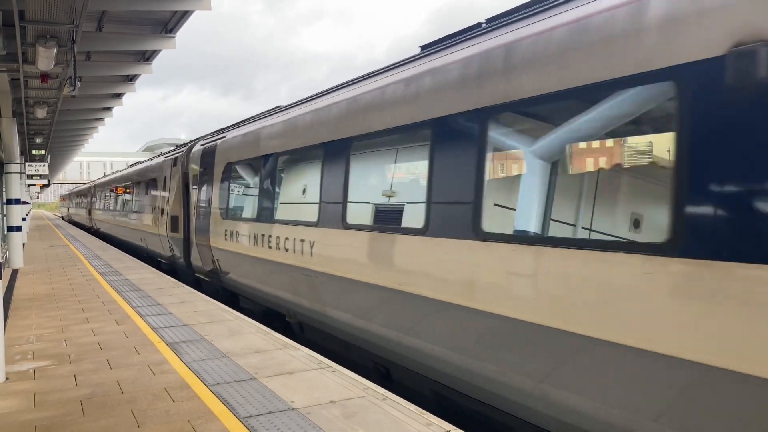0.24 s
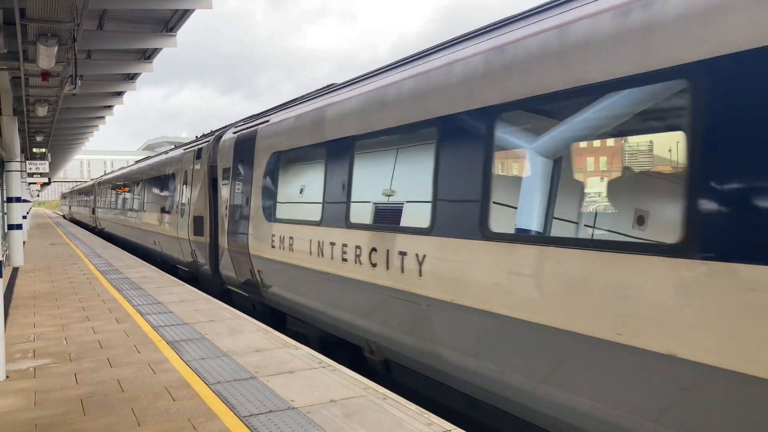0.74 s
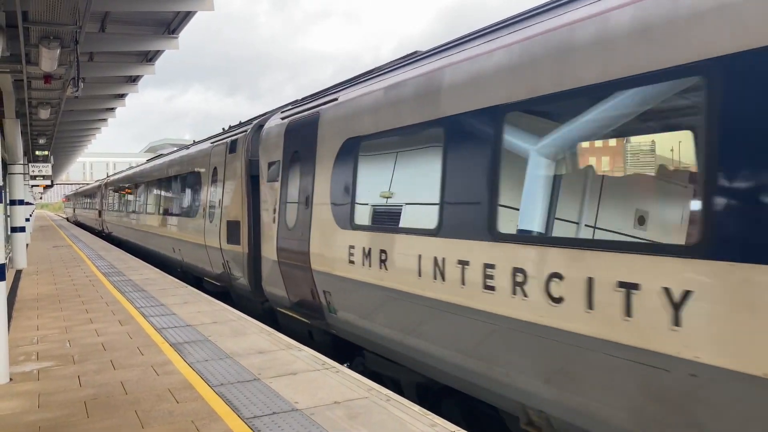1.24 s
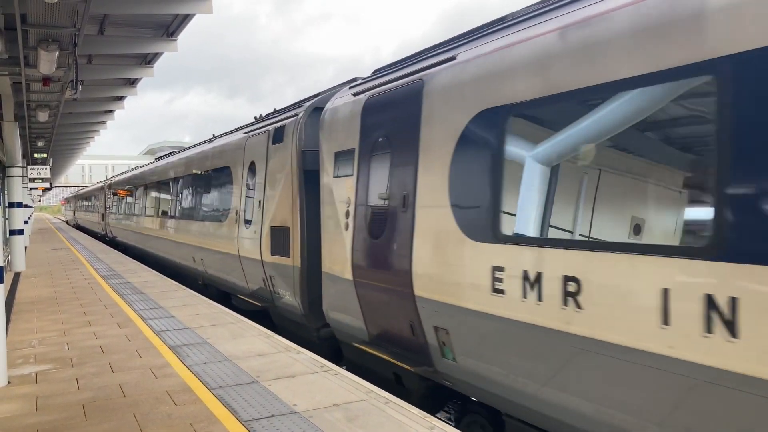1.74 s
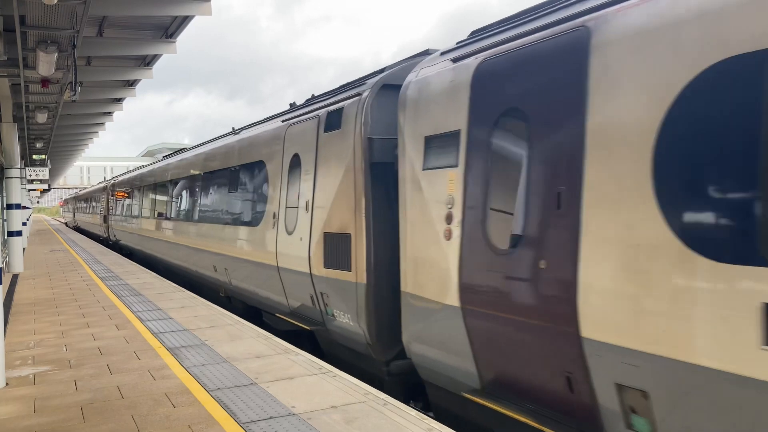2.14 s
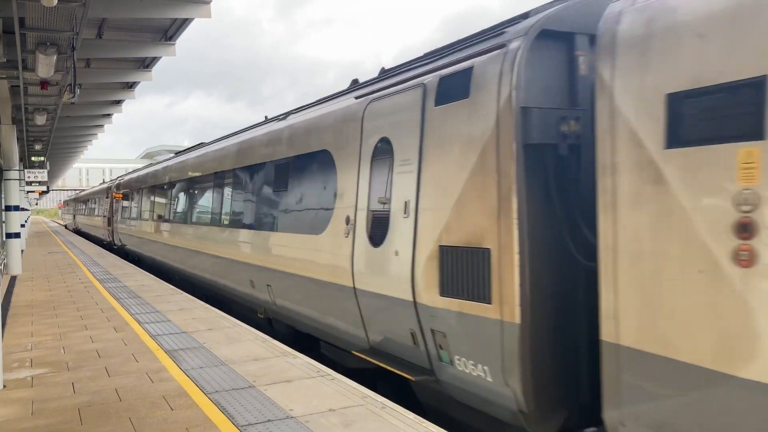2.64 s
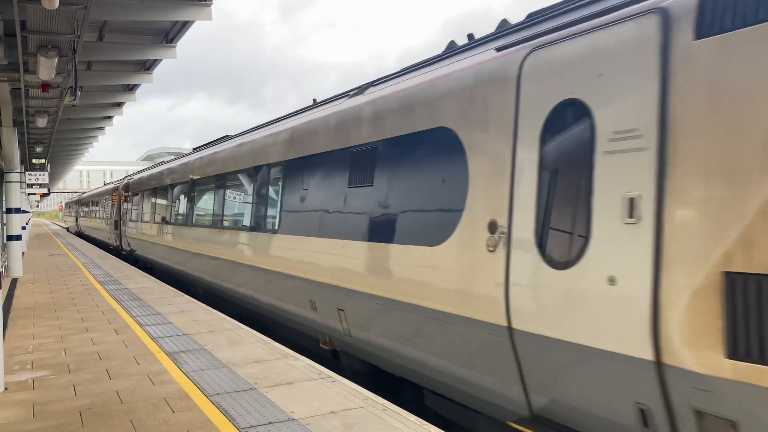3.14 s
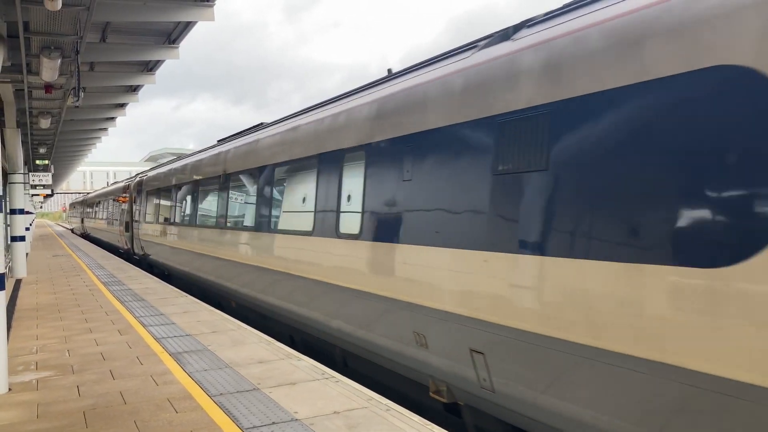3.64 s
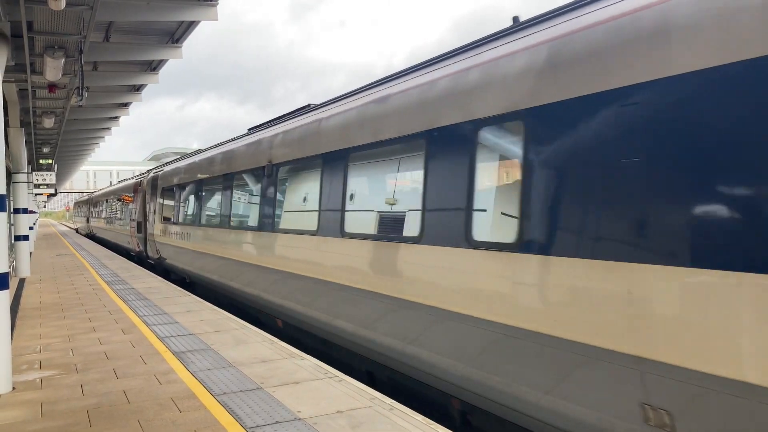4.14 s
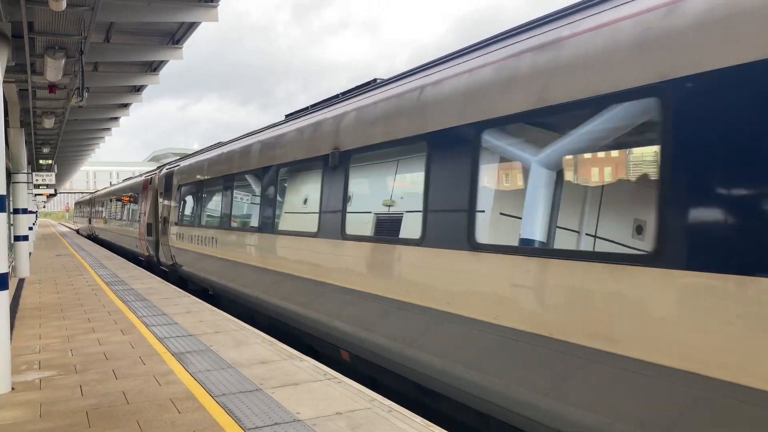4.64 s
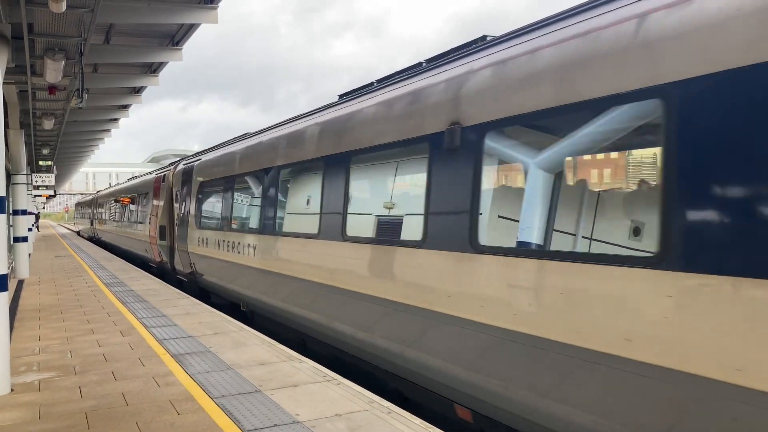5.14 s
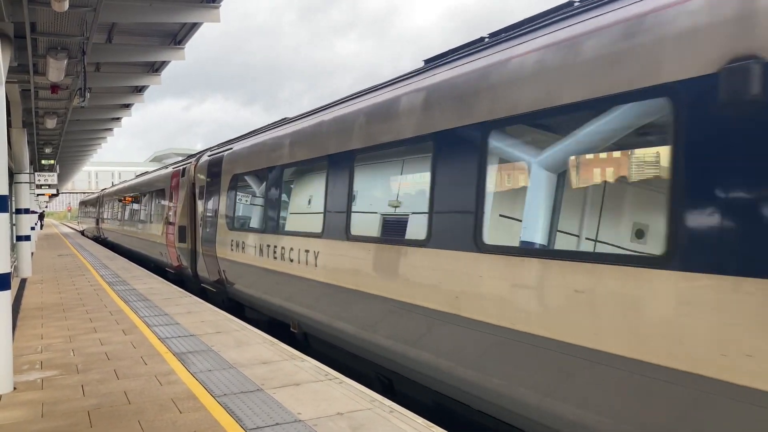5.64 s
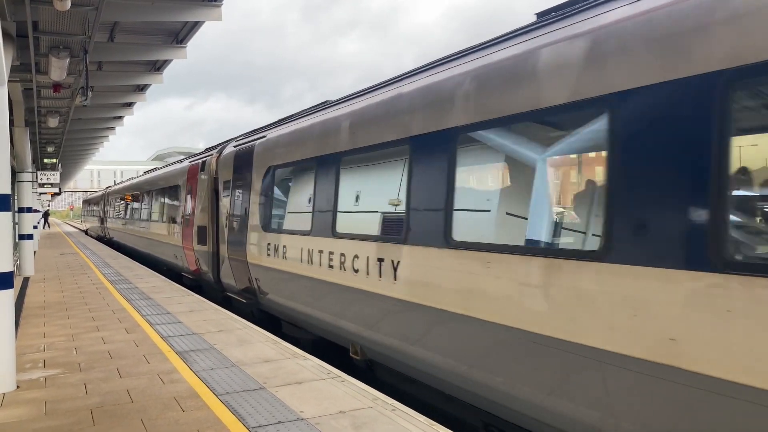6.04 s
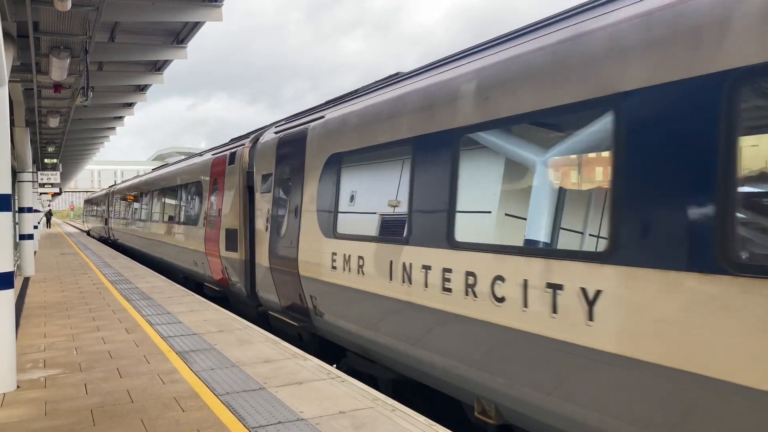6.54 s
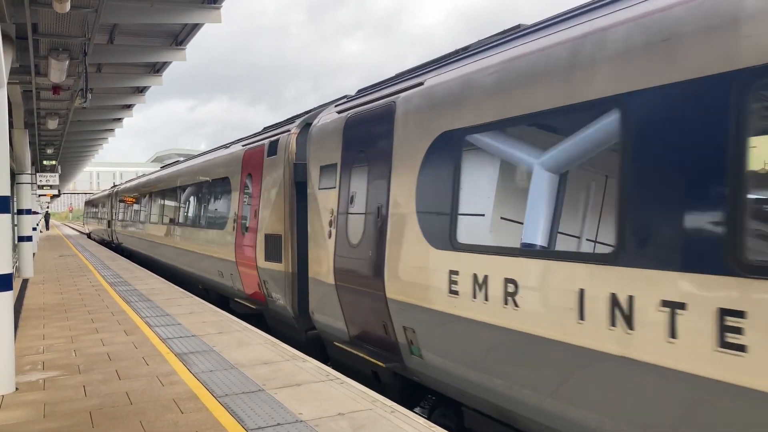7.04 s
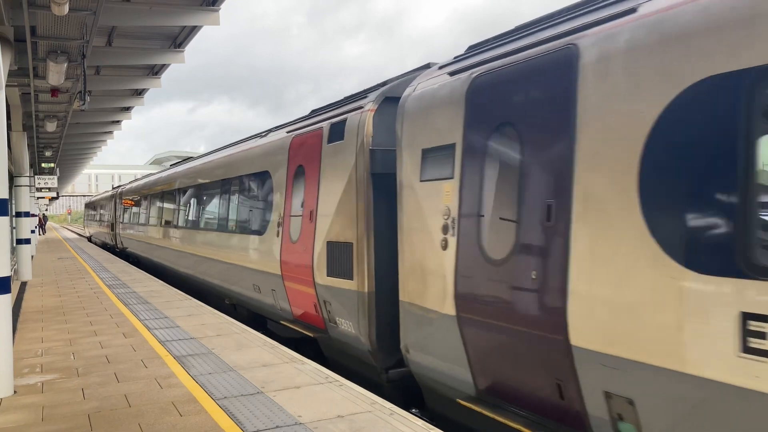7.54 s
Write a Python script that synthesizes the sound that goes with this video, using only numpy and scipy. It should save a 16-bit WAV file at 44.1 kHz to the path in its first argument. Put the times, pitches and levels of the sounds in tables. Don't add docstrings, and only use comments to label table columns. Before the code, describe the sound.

Close stereo sound of passing diesel carriages: a deep, pulsing underfloor engine drone swells and thins beneath broad rolling noise and airy hiss. Running gear knocks softly, gusts buffet the microphone, and wheels thud then clack over a rail joint, leaving thin high rings. After five seconds the engine climbs in pitch, while another, slower engine hums faintly as the next car approaches.

```python
import sys
import numpy as np
from scipy import signal
from scipy.fft import rfft, irfft, next_fast_len
from scipy.io import wavfile
from scipy.ndimage import uniform_filter1d, map_coordinates

SR = 44100
rng = np.random.default_rng(int(sys.argv[2]) if len(sys.argv) > 2 else 0)


def natural_amplitude(level_db):
    exponent = np.asarray(level_db, float) / 20
    return 10 ** exponent


def unload_wav(signal):
    wavfile.write(
        sys.argv[1],
        SR,
        np.round(np.clip(np.atleast_2d(signal).T, -1, 1) * 32767).astype(np.int16),
    )


N = 342657

# time in seconds, crank cycles in Hz.
CRANK_SPEED = [(0, 20.2), (.45, 19.63), (.8, 19.25), (1.5, 19.15), (2.3, 19.3), (3.6, 19.28), (4.4, 19.22),
               (4.75, 19.08), (5, 19.2), (5.25, 19.8), (5.55, 20.8), (6.15, 23), (6.45, 24.25),
               (6.75, 25.15), (7.05, 25.5), (7.35, 25.25), (7.77, 24.9)]
IDLE_CYCLE_HZ, NEXT_CYCLE_HZ = 19.2, 15.85
# start in seconds, end in seconds, crest in dB.
ORDER_3_SWELLS = [(-.3, .72, -12.5), (.66, 1.36, -12.5), (1.36, 2.05, -12.5), (2.05, 2.85, -14),
                  (2.82, 3.6, -13.5), (3.3, 4.4, -12), (4.38, 4.6, -18), (4.58, 4.78, -26),
                  (2.83, 3.1, -12.5), (4.68, 5.85, -12.5), (5.7, 6.5, -14.5), (6.5, 7.12, -19),
                  (7.14, 8.2, -26.5)]
ORDER_6_SWELLS = [(-.05, .62, -15.5), (.5, .96, -14.5), (.97, 1.28, -18.5), (1.3, 1.85, -23),
                  (1.8, 2.23, -22), (2.23, 2.56, -19), (2.57, 2.82, -19.5), (2.82, 3.4, -16),
                  (3.3, 3.85, -17), (4.1, 4.6, -18), (4.35, 5.0, -15), (4.95, 5.38, -22),
                  (5.4, 5.95, -10.5), (5.7, 6.23, -15), (6.23, 6.85, -12.5), (6.76, 7.07, -20.5),
                  (7.07, 7.3, -21.5), (7.3, 7.66, -23.5), (7.66, 7.9, -21)]
ORDER_9_SWELLS = [(-.3, .7, -30), (2.22, 2.42, -24.5), (3.4, 4.2, -22), (4.2, 4.65, -20),
                  (4.55, 4.92, -27.5), (4.95, 5.45, -19.5), (5.3, 5.75, -25)]
ORDER_7_SWELLS = [(1.2, 1.6, -24.5), (1.55, 2.1, -26.5), (2.1, 2.64, -27), (2.65, 2.9, -22.5),
                  (2.92, 3.2, -30), (3.4, 4.4, -25.5), (4.0, 4.6, -20.5), (4.5, 5.08, -21), (5.0, 5.5, -30),
                  (5.95, 6.4, -28.5)]
ORDER_8_SWELLS = [(-.3, .4, -25), (1.0, 1.5, -28), (3.45, 4.25, -31), (4.25, 5.2, -28.5), (5.9, 6.4, -29.5)]
# crank order, level in dB over order 7.
UNEVEN_ORDERS = [(2, -10), (4, -15), (5, -11.5), (10, -16)]
# start in seconds, end in seconds, crest in dB.
NEXT_ENGINE_SWELLS = [
    [(5.97, 6.82, -26.5), (6.9, 7.75, -30.5)],
    [(7.2, 7.738, -23)],
    [(6.4, 8.9, -32.5), (6.95, 8.6, -21)],
]

# time in seconds, nearness in dB.
NEARNESS = [(0, 3), (.17, 2.5), (.7, 0.5), (1.2, 0), (1.8, -2), (2.5, -2), (3.0, -2), (3.7, 0), (4.4, 1.5),
            (5.26, 3), (5.85, 1), (6.3, 1), (7.0, 0), (7.3, -1.5), (7.77, -3)]
# frequency in Hz, density in dB per Hz.
RUMBLE_SPECTRUM = [(25, -23.5), (40, 2), (70, 0.5), (110, 1.5), (160, 1.5), (250, -6), (400, -6.5),
                   (600, -13.5), (900, -52.5)]
ROAR_SPECTRUM = [(210, -8.5), (350, -1.5), (384, -8), (425, -6.5), (694, -4), (741, -2), (859, -3.5),
                 (1030, -5), (1090, -5), (1460, -8), (1670, -5.5), (1850, -11.5), (3200, -21), (4160, -66),
                 (7040, -120)]
HISS_SPECTRUM = [(1500, -16.5), (2200, -2), (2600, -7.5), (3000, -4), (4000, -8.5), (6000, -17.5),
                 (7000, -18), (8000, -24), (9000, -25), (10500, -32), (12500, -44), (14000, -47),
                 (15200, -66)]
# time in seconds, extra dB per octave above 3 kHz.
FAN_BRIGHTNESS = [(0, 0.5), (.6, 0.3), (1.5, 0), (2.4, -1.5), (3.5, -3.2), (4.5, -3), (5.2, -0.5), (6, 0.7),
                  (6.8, 0.3), (7.2, -1.7), (7.77, 0)]
RUMBLE_DB, ROAR_DB, HISS_DB, FRAME_DB = -23., -26., -35.5, -32.
RUMBLE_SHARE, ROAR_SHARE, HISS_SHARE, FRAME_SHARE = 0.71, 1, 0.86, 1.68
RUMBLE_DB_PER_HZ, HISS_DB_PER_HZ, FRAME_DB_PER_HZ = 0.27, 0.15, -0.87
# frequency in Hz, left-right correlation from 0 to 1.
PORT_LIKENESS = [(60, 0.83), (130, 0.91), (270, 0.8), (580, .35), (1100, .42), (1400, .25), (1800, .43),
                 (2100, .17), (9000, .1)]
# frequency in Hz, lead of the right port in radians.
PORT_PHASE = [(200, 0), (600, .9), (1000, .9), (1400, 1.1), (1800, 2.2), (2300, -1), (2700, -.6),
              (3300, -2.6)]
# frequency in Hz, left minus right in dB.
PORT_BALANCE = [(60, -2), (110, -5.5), (190, -0.5), (350, -2.5), (630, -2), (1130, -1.5), (2040, 0.5),
                (3680, -1), (6620, -2), (11900, 3.5)]

# frequency in Hz, width in Hz, level in dB.
FRAME_MODES = [(829, 119, -1.5), (834, 21, -17), (1604, 310, -9.5), (1717, 60, -7), (2973, 81, -19.5)]
# frequency in Hz, width in Hz, level in dB.
WHEEL_MODES = [(380.3, 13.3, -4), (1017, 26, -1)]
# start in seconds, end in seconds, crest in dB.
LOW_SONG = [(-.2, .15, -33), (.3, 1.15, -29.5), (1.25, 1.7, -29.5), (2.1, 2.7, -34), (2.85, 3.4, -32.5),
            (4.35, 4.7, -34), (6.05, 6.6, -28), (6.9, 7.3, -30)]
HIGH_SONG = [(0, .6, -37), (.95, 1.4, -37), (1.85, 2.2, -38), (2.45, 2.85, -38), (3.3, 4.45, -34),
             (4.5, 5.0, -35), (5.0, 6.1, -36.5), (6.1, 6.55, -36)]

# time in seconds, level in dB, frequency in
# Hz, T60 in seconds.
KNOCKS = [
    (0.477, -19, 395, 0.24),
    (1.285, -15, 220, .07),
    (1.338, -15, 188, 0.07),
    (1.392, -10.5, 377, 0.083),
    (1.502, -18, 374, 0.22),
    (1.569, -24, 385, 0.13),
    (2.72, -31, 503, 1.9),
    (2.742, -18, 230, 0.11),
]
# start in seconds, end in seconds, thump in dB, flutter in dB,
# share felt by both ports from 0 to 1.
GUSTS = [(.52, 0.722, -23.5, -44, 1), (0.68, 0.96, -21.5, -28.5, 0), (1.2, 1.474, -19, -25.5, 1),
         (1.5, 1.735, -24, -37, .35), (2.067, 2.27, -16.5, -28, 0.9), (2.2, 2.392, -12.5, -19, .75),
         (2.32, 2.542, -16, -15, .75), (2.48, 2.64, -15, -19, 0.7), (2.719, 2.812, -16, -24.5, 0.5),
         (2.794, 2.957, -23.5, -35, 0), (3.22, 3.38, -21, -26, 0.9), (3.667, 3.95, -20.5, -52, .8),
         (4.92, 5.097, -23.5, -50, 0.9)]
# time in seconds, peak in dB, left minus right in dB.
THUDS = [
    (2.582, -13.5, -5),
    (3.126, -9.5, -5.5),
    (4.245, -12.5, -3.5),
    (4.775, -12, 0.5),
    (5.155, -10.5, -3),
]
THUD_HZ, THUD_WIDTH_HZ, THUD_T60_S, THUD_DB = 720, 500, .14, -8
# time in seconds, blow in dB, rise in seconds, T60 in seconds,
# rail ring in dB over the blow.
CLACKS = [
    (2.652, -31.5, 0.032, 0.49, -11.5),
    (3.18, -35, 0.052, 0.61, -15.5),
    (4.3, -33, 0.05, 0.5, -12),
    (4.835, -34, 0.054, 0.55, -14.5),
]
# frequency in Hz, density in dB per Hz.
CLACK_SPECTRUM = [(500, -7), (1800, 5), (3500, 5), (5000, -1), (7000, -1.5), (8300, -13), (10000, -13.5),
                  (14000, -28), (16000, -44)]
# frequency in Hz, width in Hz, level in dB.
RAIL_MODES = [(7890, 160, 0), (10080, 170, -3), (14100, 140, -8)]

# frequency in Hz, width in Hz, depth in dB.
SUM_DIPS = [(5900, 900, -2), (9170, 1050, -23), (13450, 1350, -19), (14900, 1000, -10)]
DIFFERENCE_DIPS = [(4500, 1500, -2), (7200, 1100, -3), (11550, 1400, -26), (13200, 1500, -3),
                   (15100, 1200, -14)]


def evened(x):
    return x / np.sqrt(np.mean(x ** 2) + 1e-20)


def steadied(x, size):
    power = uniform_filter1d(np.mean(x ** 2, axis=0), size=size)
    return x / np.sqrt(power + 1e-20)


def read(points, hz):
    f, value = np.transpose(points)
    return np.interp(np.log(hz + 1), np.log(f + 1), value)


def columns(rows):
    s, *values = np.transpose(rows)
    return [np.interp(np.arange(N) / SR, s, v) for v in values]


def drift(rate_hz):
    knots = rng.standard_normal(400)
    return map_coordinates(knots, [np.arange(N) / SR * rate_hz % 390], order=3)


def swells(rows, floor_db, shape):
    t, power = np.arange(N) / SR, np.full(N, natural_amplitude(2 * floor_db))
    for start_s, end_s, crest_db in rows:
        progress = np.clip((t - start_s) / (end_s - start_s), 0, 1)
        power += natural_amplitude(2 * crest_db) * abs(np.sin(np.pi * progress)) ** shape
    return 10 * np.log10(power)


def level(base_db, share, db_per_hz):
    return base_db + share * columns(NEARNESS)[0] + db_per_hz * (columns(CRANK_SPEED)[0] - IDLE_CYCLE_HZ)


def resonate(x, hz, width_hz):
    carrier = np.exp(2j * np.pi * np.cumsum(hz * np.ones(N)) / SR)
    r = np.exp(-np.pi * width_hz / SR)
    return 2 * (carrier * signal.lfilter([1 - r], [1, -r], x / carrier)).real


def noise(spectrum, patchy_db, tilt_db=np.zeros(N)):
    frames, hz = N // 512 + 5, np.fft.rfftfreq(2048, 1 / SR)
    a, b, c, d, patches = rng.standard_normal((frames, len(hz), 5)).T
    patches = uniform_filter1d(patches, size=16, axis=0)
    patches = evened(uniform_filter1d(patches, size=6, axis=1))
    octaves = np.log2(np.maximum(hz / 3000, 1))
    tilt = np.outer(octaves, tilt_db[np.clip(np.arange(frames) * 512, 0, N - 1)])
    same = np.clip(read(PORT_LIKENESS, hz), -1, 1)[:, None]
    left = a + 1j * b
    right = same * np.exp(1j * read(PORT_PHASE, hz))[:, None] * left + np.sqrt(1 - same ** 2) * (c + 1j * d)
    z = np.array([left, right])
    z *= natural_amplitude(read(spectrum, hz)[:, None] + patchy_db * patches + tilt)
    z *= natural_amplitude(np.multiply.outer([.5, -.5], read(PORT_BALANCE, hz)))[..., None]
    return evened(signal.istft(z, nperseg=2048, noverlap=1536)[1][:, :N])


def exhaust(cycle_hz, orders, wobble, flutter_db, right_lag, pan_db):
    angle, out = 2 * np.pi * np.cumsum(cycle_hz) / SR, np.zeros((2, N))
    for order, level_db in orders:
        phase = order * angle + wobble * np.sqrt(order) * drift(8.3) + 2 * np.pi * rng.random()
        size = np.sqrt(2) * natural_amplitude(level_db + flutter_db * drift(15.0))
        lag = right_lag * np.sqrt(order / 3) * (1 + 0.66 * drift(3.25))
        out += size * np.cos([phase + lag / 2, phase - lag / 2])
    return out * natural_amplitude(np.array([[.5], [-.5]]) * pan_db)


def engines():
    ninth_db = swells(ORDER_9_SWELLS, floor_db=-42.5, shape=1.2)
    seventh_db = swells(ORDER_7_SWELLS, floor_db=-43.5, shape=0.78)
    orders = [
        (3, swells(ORDER_3_SWELLS, floor_db=-34, shape=1.29)),
        (6, swells(ORDER_6_SWELLS, floor_db=-36, shape=2.4)),
        (9, ninth_db),
        (7, seventh_db),
        (12, ninth_db - 12),
        (8, swells(ORDER_8_SWELLS, floor_db=-41.5, shape=1.1)),
    ]
    orders += [(order, seventh_db + db) for order, db in UNEVEN_ORDERS]
    near = exhaust(columns(CRANK_SPEED)[0], orders, wobble=.04, flutter_db=.7, right_lag=.25, pan_db=-2.1)
    next_db = [swells(rows, floor_db=-57.5, shape=2.0) for rows in NEXT_ENGINE_SWELLS]
    next_orders = zip((3, 4, 8), next_db)
    far = exhaust(np.full(N, NEXT_CYCLE_HZ), next_orders, wobble=.06, flutter_db=1.2, right_lag=.25, pan_db=-2.1)
    return near + far


def rolling():
    throb = np.cos(2 * np.pi * 3 * np.cumsum(columns(CRANK_SPEED)[0]) / SR)
    rumble_db = level(RUMBLE_DB, RUMBLE_SHARE, RUMBLE_DB_PER_HZ) + 1.0 * drift(6.)
    roar_db = level(ROAR_DB, ROAR_SHARE, 0) + 0.38 * drift(7.) + 0.6 * throb
    hiss_db = level(HISS_DB, HISS_SHARE, HISS_DB_PER_HZ) + 0.19 * drift(6.8) + 0.27 * throb
    out = natural_amplitude(rumble_db) * noise(RUMBLE_SPECTRUM, patchy_db=1.5)
    out += natural_amplitude(roar_db) * noise(ROAR_SPECTRUM, patchy_db=1.53)
    out += natural_amplitude(hiss_db) * noise(HISS_SPECTRUM, patchy_db=1.6, tilt_db=columns(FAN_BRIGHTNESS)[0])
    return out


def singing():
    frame_db = level(FRAME_DB, FRAME_SHARE, FRAME_DB_PER_HZ)
    low_db = swells(LOW_SONG, floor_db=-41.5, shape=0.51)
    high_db = swells(HIGH_SONG, floor_db=-40.5, shape=2.0)
    layers = [(*mode, frame_db) for mode in FRAME_MODES]
    layers += [(*mode, db) for mode, db in zip(WHEEL_MODES, (low_db, high_db))]
    out = np.zeros((2, N))
    for hz, width_hz, db, level_db in layers:
        shake = rng.standard_normal((2, N))
        same = np.clip(1.6 * read(PORT_LIKENESS, hz) * np.cos(read(PORT_PHASE, hz)), -.95, .95)
        shake[1] = same * shake[0] + np.sqrt(1 - same ** 2) * shake[1]
        ring = evened(resonate(resonate(shake, hz, width_hz), hz, 2 * width_hz))
        out += natural_amplitude(db + level_db + 1.4 * drift(12.)) * ring
    return out


def knocks():
    t, out = np.arange(N) / SR, np.zeros((2, N))
    for s, db, hz, t60_s in KNOCKS:
        age_s = np.maximum(t - s - np.array([[0], [.0003]]), 0)
        size = np.sqrt(2) * natural_amplitude(db - 60 * age_s / t60_s) * np.minimum(age_s / .012, 1)
        out += size * np.sin(2 * np.pi * hz * age_s)
    return out


def draught():
    thump_db = swells([(a, b, db) for a, b, db, _, _ in GUSTS], floor_db=-53, shape=1.23)
    flutter_db = swells([(a, b, db) for a, b, _, db, _ in GUSTS], floor_db=-52, shape=1.8)
    starts_s, *_, shares = np.transpose(GUSTS)
    latest = np.maximum(np.searchsorted(starts_s, np.arange(N) / SR) - 1, 0)
    shared = np.clip(shares, 0, 1)[latest]
    eddies = rng.standard_normal((2, 2, N))
    eddies[:, 1] = shared * eddies[:, 0] + 0.46 * eddies[:, 1]
    thumps = resonate(resonate(eddies[0] * natural_amplitude(0.73 * drift(24.62)), 73, 89), 85, 160)
    flutter_hz = np.clip(264 + 14 * (flutter_db + 18), 150, 500)
    flutter = eddies[1] * natural_amplitude(2.6 * drift(60.))
    for width_hz in (340, 480, 620):
        flutter = resonate(flutter, flutter_hz, width_hz)
    return natural_amplitude(thump_db) * steadied(thumps, size=6000) + natural_amplitude(flutter_db) * steadied(flutter, size=2500)


def thuds():
    t, size = np.arange(N) / SR, np.zeros((2, N))
    for s, db, pan_db in THUDS:
        age_s = np.maximum(t - s, 0)
        port_db = db + THUD_DB + np.array([[.5], [-.5]]) * pan_db
        size += natural_amplitude(port_db - 60 * age_s / THUD_T60_S) * np.minimum(age_s / .002, 1)
    shake = rng.standard_normal((2, N))
    shake[1] -= 0.31 * shake[0]
    burst = resonate(resonate(shake, THUD_HZ, THUD_WIDTH_HZ), THUD_HZ, 2 * THUD_WIDTH_HZ)
    return size * evened(burst)


def clacks():
    t, blow, ring = np.arange(N) / SR, np.zeros(N), np.zeros(N)
    for s, db, rise_s, t60_s, ring_db in CLACKS:
        climb = np.exp(np.minimum(t - s, 0) / rise_s)
        blow += natural_amplitude(db - 60 * np.maximum(t - s, 0) / t60_s) * climb
        blow += natural_amplitude(db - 6 - 60 * abs(t - s) / 0.13)
        ring_decay_db = 60 * np.maximum(t - s - .02, 0) / (1.3 * t60_s)
        ring += natural_amplitude(db + ring_db - ring_decay_db) * np.clip((t - s) / 0.012 + 1, 0, 1)
    shake, rail = rng.standard_normal((2, N)), np.zeros((2, N))
    for hz, width_hz, db in RAIL_MODES:
        rail += natural_amplitude(db) * evened(resonate(resonate(shake, hz, width_hz), hz, 3 * width_hz))
    return blow * noise(CLACK_SPECTRUM, patchy_db=1.2) + ring * rail


def scene():
    return engines() + rolling() + singing() + knocks() + draught() + thuds() + clacks()


def dips(x, table):
    size = next_fast_len(N)
    hz = np.fft.rfftfreq(size, 1 / SR)
    cut_db = sum(db * np.exp(-(2 * (hz - f) / width_hz) ** 2) for f, width_hz, db in table)
    return irfft(rfft(x, size) * natural_amplitude(cut_db), size)[:N]


def low_pass(x):
    return signal.sosfilt(signal.butter(12, 15020, fs=SR, output="sos"), x)


def record(dry):
    x = signal.sosfilt(signal.butter(4, 36, "high", fs=SR, output="sos"), dry)
    over = np.maximum(abs(x) - .6, 0)
    x = x - np.sign(x) * (over - .33 * np.tanh(over / .33))
    mid = dips((x[0] + x[1]) / 2, SUM_DIPS)
    side = dips((x[0] - x[1]) / 2, DIFFERENCE_DIPS)
    return low_pass(np.array([mid + side, mid - side]))


dry = scene()
out = record(dry)
unload_wav(out)
```